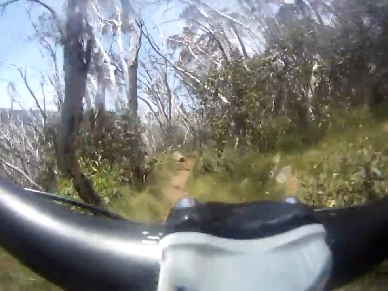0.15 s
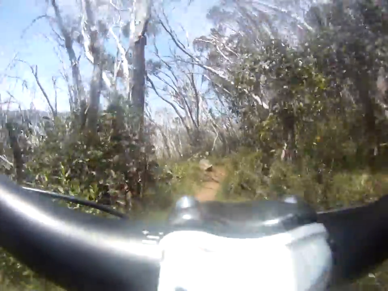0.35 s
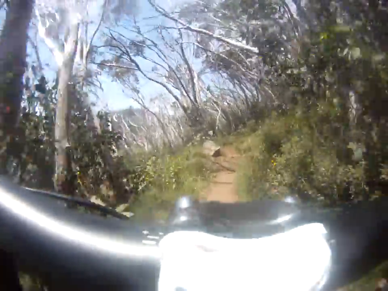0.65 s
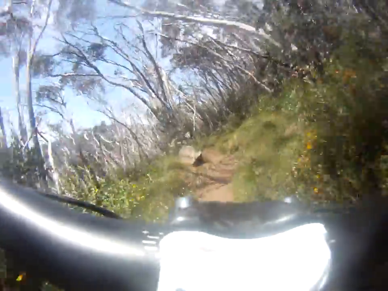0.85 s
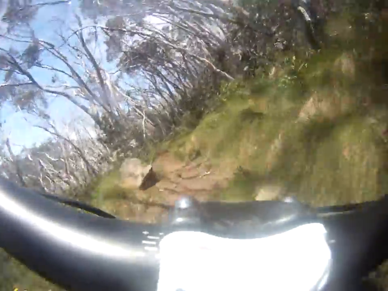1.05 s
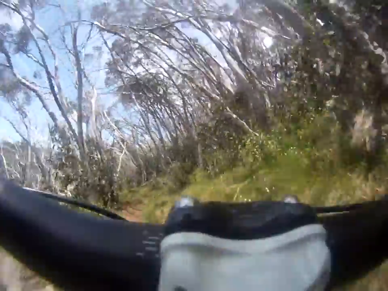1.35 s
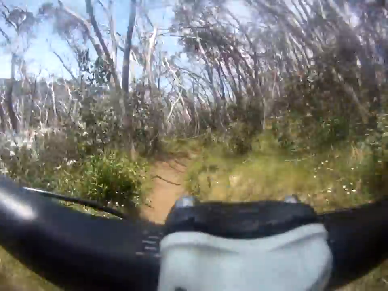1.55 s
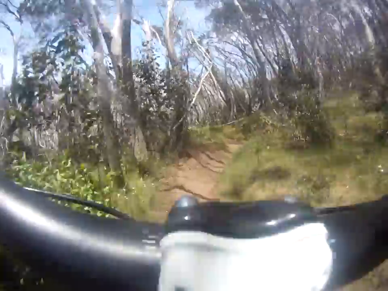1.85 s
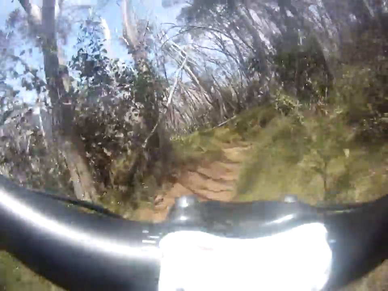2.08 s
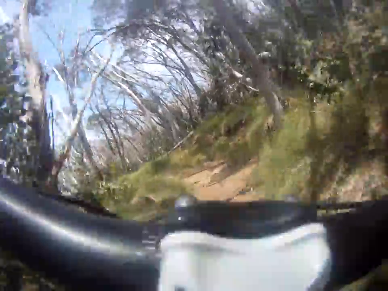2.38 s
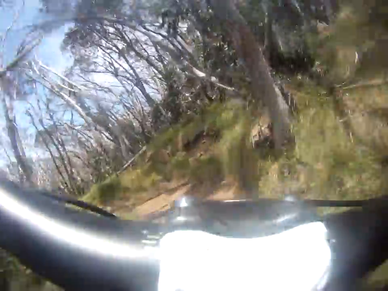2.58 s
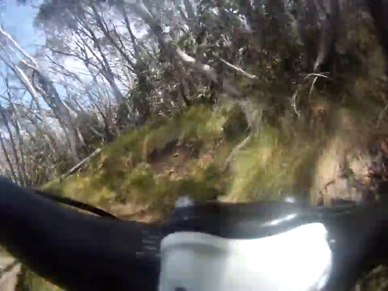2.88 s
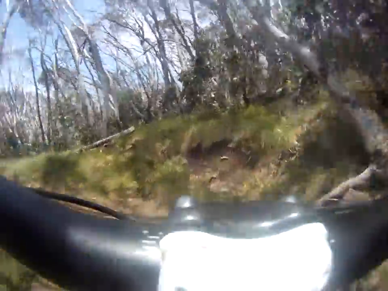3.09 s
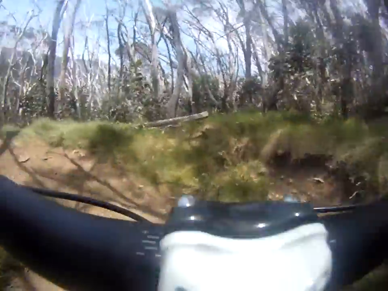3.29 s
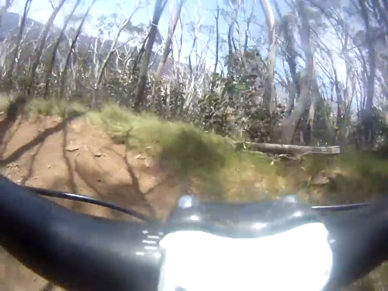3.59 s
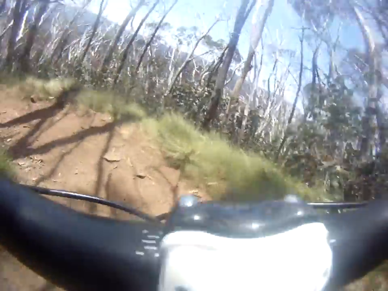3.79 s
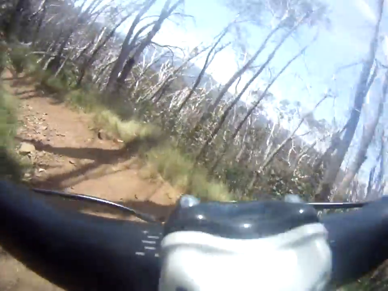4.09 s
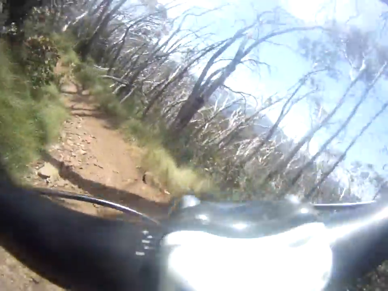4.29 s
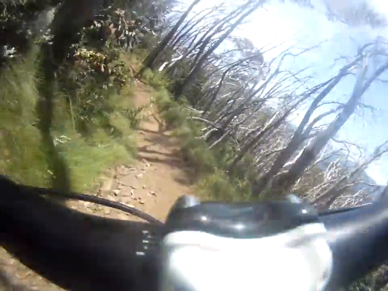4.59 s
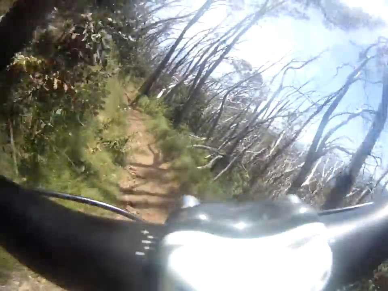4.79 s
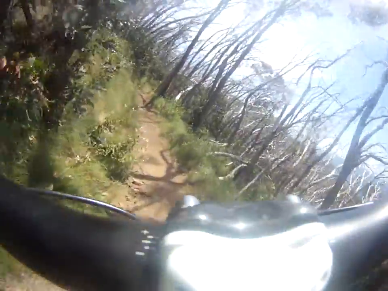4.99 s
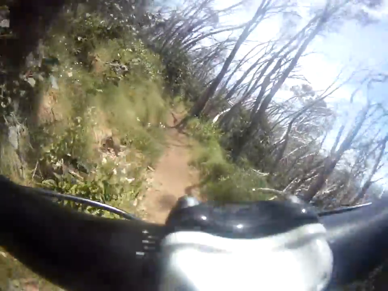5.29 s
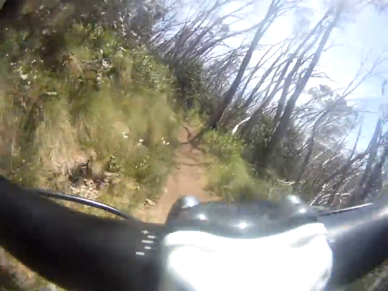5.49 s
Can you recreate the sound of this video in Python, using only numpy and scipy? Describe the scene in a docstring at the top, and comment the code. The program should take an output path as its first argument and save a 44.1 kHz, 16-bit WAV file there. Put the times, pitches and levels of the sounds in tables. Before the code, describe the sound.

A mountain bike descends a dirt track through open woodland, heard from a small camera on the handlebar. Rough tyre drumming and hollow, boxy thuds run throughout, with chain and cable rattle above. Hard hits with metallic pings come early, near the middle and again just after. A corner adds a brief low drone and a soft tread scrub, then the knocks thin out. Low wind buffets the case; the treble is gritty.

```python
"""Hollow thuds and a rough drumming come first: a mountain bike runs down a dirt trail, heard by a handlebar camera.
Grains and short sine swings drum the tyres and bumps through the mount into the camera housing.
Filtered ticks and noise rattle and clack the chain and cables; short frame resonances ping for pebbles.
One corner brings a drone and a scrub of the tread; filtered noise makes the wind that buffets the case.
The camera ducks on hard hits and holds each sample of a slow converter, which adds a gritty treble."""
import sys
import numpy as np
from scipy import signal
from scipy.fft import rfft, irfft
from scipy.io import wavfile
from scipy.ndimage import uniform_filter1d

SR = 44100
rng = np.random.default_rng(int(sys.argv[2]) if len(sys.argv) > 2 else 0)


def dump_mix(stems):
    """Bounce the given channels to the path in sys.argv[1] as a 16-bit WAV at rate SR."""
    frames = np.atleast_2d(stems).T  # one column per channel
    limited = np.clip(frames, -1, 1)  # hard clip at full scale
    pcm = np.round(limited * 32767).astype(np.int16)
    wavfile.write(sys.argv[1], SR, pcm)


N = 249165  # samples in the scene


def undb(db):
    """Decibels to gain."""
    return 10 ** (np.asarray(db) / 20)


def unit(x):
    """Scale to rms 1."""
    return x / np.sqrt(np.mean(x ** 2))


def power(x, span_s):
    """Running mean square."""
    return uniform_filter1d(x ** 2, max(int(span_s * SR), 2)) + 1e-12


def steady(x):
    """Keep the flutter but hold the slow level near rms 1."""
    return x / np.sqrt(power(x, 0.077))


def walk(rate_hz):
    """Random wander of rms 1, in straight lines between new values drawn at rate_hz."""
    knots = rng.standard_normal(4096)
    return unit(np.interp(np.arange(N) / SR * rate_hz, np.arange(len(knots)), knots))


def curves(table):
    """The columns of a timed table, interpolated sample by sample."""
    start_s, *columns = np.transpose(table)
    return [np.interp(np.arange(N) / SR, start_s, column) for column in columns]


def response(colour, size):
    """Causal minimum-phase impulse response of a (pitch_hz, level_db) colour."""
    pitch_hz, level_db = np.transpose(colour)
    f = np.maximum(np.fft.rfftfreq(size, 1 / SR), 1)
    gain = undb(np.interp(np.log(f), np.log(pitch_hz), level_db))
    # folding the cepstrum forward in time makes the response start at once
    cepstrum = irfft(np.log(gain))
    cepstrum[1:size // 2] *= 2
    cepstrum[size // 2 + 1:] = 0
    return irfft(np.exp(rfft(cepstrum)))[:size // 2]


def ring(push, body):
    """Drive a body, given by its impulse response, with a force."""
    return signal.fftconvolve(push, body)[:len(push)]


def grains(per_s, spread_db):
    """Random tiny impacts of uneven size and either sign."""
    strikes = rng.random(N) < per_s / SR
    sign = rng.choice([-1, 1], N)
    return strikes * sign * undb(spread_db * np.minimum(rng.standard_normal(N), 2.5))


def add(out, at_s, sound, peak):
    """Mix in a sound so that its sample number peak falls at at_s."""
    start = int(at_s * SR) - peak
    sound = sound[max(-start, 0):]
    start = max(start, 0)
    out[start:start + len(sound)] += sound


def hump(at_s, length_s):
    """A smooth rise to 1 and back."""
    return np.exp(-np.minimum(((np.arange(N) / SR - at_s) / length_s) ** 2, 20))


# colour of the mount and camera housing, three broad resonances: pitch_hz [Hz], level_db [dB]
HOUSING_COLOUR = [(130, -51), (230, -22.5), (295, -14.5), (327, -2), (370, -17), (430, -14.5), (520, -2),
                  (563, 5), (600, -9), (750, -19), (960, -32.5), (1100, -16), (1250, -17), (1400, -31),
                  (3000, -49)]


def tyres(jolt):
    """Knobs and grit drum on the housing, harder at each jolt, between the thuds of lumpy ground."""
    impacts = grains(per_s=2500, spread_db=6.5) * undb(3.42 * jolt)
    drumming = steady(ring(impacts, response(HOUSING_COLOUR, size=8192)))
    thuds = lumps(pitch_hz=529.4, scatter_octaves=0.26, build_s=0.0045, spread_db=7)
    return undb(-1.2) * drumming + undb(-9.0) * thuds


def lumps(pitch_hz, scatter_octaves, build_s, spread_db, count=150, size=1024):
    """Small clods and ruts give a stream of lesser thuds, each at its own pitch."""
    out = np.zeros(N + 2 * size)
    t = (np.arange(size) - size // 2) / SR
    draws = rng.uniform(-1, 1, size=(count, 5))
    for k, (when, pitch, strength, *phase) in enumerate(draws):
        lump_hz = pitch_hz * 2 ** (scatter_octaves * pitch)
        sound = undb(spread_db * strength) * thud(t, build_s, lump_hz, phase)
        at_s = abs(k + when) / count * N / SR  # an even stream, each thud up to one step early or late
        add(out, at_s, sound, size // 2)
    return unit(out[:N])


# wheels striking roots and stones:
# peak_s [s], level_db [dB], build_s (rise of the swing) [s], pitch_hz (at the peak) [Hz]
WHEEL_KNOCKS = [(.02, -7.5, 0.0018, 514), (.039, -4, 0.0025, 582.6), (.235, -8.5, 0.0053, 548),
                (.524, -7, 0.0072, 554), (.675, 2.5, 0.0006, 730), (.831, -8.5, 0.0062, 539),
                (.86, -9, 0.0062, 584), (.967, -10, 0.0053, 566), (1.04, -10.5, 0.0037, 609),
                (1.057, -8.5, 0.015, 559), (1.218, -6, 0.0023, 582), (1.24, -10, 0.0098, 554),
                (1.42, -12.5, 0.026, 555.5), (1.465, -14.5, 0.017, 553), (1.547, -15, 0.0022, 559),
                (1.627, -24, 0.0061, 568), (1.777, -8, 0.0024, 571), (1.822, -2.5, 0.007, 532.4),
                (2.023, -16, 0.0034, 507), (2.165, -14, 0.0017, 532), (2.416, -10, 0.00093, 602),
                (2.468, -8, 0.0036, 645), (2.53, 1.5, 0.00095, 557), (2.58, -19, 0.0064, 537),
                (2.623, -8.5, 0.0029, 512.6), (2.65, -8, 0.0019, 523.4), (2.696, -7.5, 0.0015, 510.5),
                (2.741, -6, 0.0016, 492), (2.849, -8, 0.003, 535), (3.276, 4, 0.0022, 554),
                (3.341, -15, 0.017, 570), (3.358, -9, 0.0074, 548), (3.776, -9, 0.0027, 584),
                (3.829, -7.5, 0.0041, 552), (3.869, -11.5, 0.0055, 560), (3.957, -10.5, .003, 524),
                (4.049, -13, 0.0037, 579.4), (4.067, -15.5, 0.02, 570), (4.109, -21, 0.0069, 600),
                (4.262, -16, 0.0034, 500), (4.474, -20.5, 0.0063, 571), (4.579, -7.5, 0.0023, 660),
                (4.791, -15.5, 0.0053, 624)]


def knocks(size=4096):
    """One thud for each root or stone that a wheel strikes."""
    out = np.zeros(N + 2 * size)
    t = (np.arange(size) - size // 2) / SR
    phases = rng.random((len(WHEEL_KNOCKS), 2))
    for (peak_s, level_db, build_s, pitch_hz), phase in zip(WHEEL_KNOCKS, phases):
        add(out, peak_s, undb(level_db) * thud(t, build_s, pitch_hz, phase), size // 2)
    return out[:N]


def thud(t, build_s, pitch_hz, phase, fall_s=0.0027, sag_octaves_per_s=25, sag_s=0.0052,
         upper_ratio=2.07, upper_db=-16.5):
    """The camera rocks in its mount: the swing builds, sags in pitch and stops short; the case rings above."""
    swell = np.exp(-(t / np.where(t < 0, build_s, fall_s)) ** 2)
    # the pitch slides down through pitch_hz at the peak, and only close to it
    bend_octaves = -sag_octaves_per_s * t * np.exp(-(t / sag_s) ** 2 / 2)
    turns = pitch_hz * np.cumsum(2 ** bend_octaves) / SR
    rocking = np.sin(2 * np.pi * (turns + phase[0]))
    case = undb(upper_db) * np.sin(2 * np.pi * (upper_ratio * turns + phase[1]))
    return np.sqrt(2) * swell * (rocking + case)


# a bump presses the tyre into the ground, then the rebound unloads it; both grow with the blow
PRESS_DB, PRESS_S = 5.5, 0.031
REBOUND_DB, REBOUND_AFTER_S, REBOUND_S = -1, 0.034, 0.02
FULL_BLOW_DB = -5.5  # a knock of this level or more gives the full press and rebound
# the bike goes light over a crest and tyres and chain fall quieter:
# middle_s [s], length_s [s], depth_db [dB]
LIGHT_CRESTS = [(0.319, 0.013, -7.5), (0.624, 0.023, -3.5), (0.78, 0.0097, -10), (1.729, 0.011, -9),
                (1.885, 0.017, -8.5), (2.677, 0.026, -8), (3.391, 0.036, -7.5), (4.437, .018, -5),
                (4.55, 0.015, -8)]


def load_db():
    """Weight on the tyres: up going into each bump, down on the rebound and over crests."""
    load = np.zeros(N)
    for peak_s, level_db, *_ in WHEEL_KNOCKS:
        press = PRESS_DB * hump(peak_s - PRESS_S / 2, PRESS_S)
        rebound = REBOUND_DB * hump(peak_s + REBOUND_AFTER_S, REBOUND_S)
        load += undb(min(level_db - FULL_BLOW_DB, 0)) * (press + rebound)
    for middle_s, length_s, depth_db in LIGHT_CRESTS:
        load += depth_db * hump(middle_s, length_s)
    return load


# colour of rattling metal as it reaches the microphone: pitch_hz [Hz], level_db [dB]
METAL_COLOUR = [(250, -33.5), (750, -7.5), (1200, 8), (1450, -1.5), (2000, 2.5), (2420, 1.5), (2730, -6.5),
                (2900, 5), (3300, -1.5), (3780, -7), (4040, -8), (4330, -11), (4760, -7), (5600, -20.5)]


def chain(jolt):
    """Links and cables share the jolts, but each part chatters in its own register; grit ticks over them."""
    shake = 0.29 + undb(3.7 * jolt + 2.3 * walk(rate_hz=130))
    edges_hz = [200, 1500, 2100, 2750, 3600, 7000]
    parts = np.zeros(N)
    for register in zip(edges_hz, edges_hz[1:]):
        ticks = grains(per_s=1000, spread_db=2.0) * shake
        parts += signal.sosfilt(signal.butter(2, register, "bandpass", fs=SR, output="sos"), ticks)
    rattle = steady(ring(parts, response(METAL_COLOUR, size=1024)))
    return undb(-0.42) * rattle + undb(-5.5) * grit(loudest_hz=2230, fall_db=15, spread_db=8.0)


def grit(loudest_hz, fall_db, spread_db, count=420, size=512):
    """Coarse grit ticks on the frame at random, each grain with its own size and colour."""
    out = np.zeros(N + 2 * size)
    t = (np.arange(size) - size // 2) / SR
    for when, halves, strength in 2 * rng.random((count, 3)) - 1:
        grain_hz = loudest_hz * 2 ** (halves / 2)  # up to half an octave either way
        tick = undb(spread_db * strength) * ping(t, grain_hz, fall_db)
        add(out, abs(when) * N / SR, tick, size // 2)
    return unit(out[:N])


# chain and cables slapping the frame:
# peak_s [s], level_db [dB], length_s (of the scrape) [s], treble_db (tilt above the knee) [dB per octave]
FRAME_SLAPS = [(.039, -15, .0021, -6), (0.447, -12.5, 0.003, 4), (0.495, -18, 0.0028, 14),
               (0.75, -21, .006, 4), (0.794, -16, .005, 2), (0.86, -14.5, 0.0021, -7),
               (0.876, -13, 0.0032, -1), (.966, -17, 0.0007, 1), (1.033, -13, 0.0031, 5),
               (1.097, -18, 0.0051, 0.5), (1.234, -17, 0.0029, 2), (1.816, -17, .0038, 4),
               (1.976, -14, 0.0019, 11), (2.065, -15.5, 0.0032, 4), (2.529, -6.5, 0.0047, 4),
               (2.813, -18.5, 0.0024, -16), (2.93, -10.5, 0.0059, -4.5), (2.998, -14, 0.0044, -3),
               (4.472, -13.5, 0.0022, -7), (4.576, -17, 0.0043, -13)]


def clacks(tail_db, tail_s, lead_s, knee_hz, size=4096):
    """Each slap is a quick scrape of noise amid loose chatter, with its own treble tilt on the metal."""
    out = np.zeros(N + 2 * size)
    t = (np.arange(size) - size // 4) / SR
    chatter = np.exp(-np.abs(t) / np.where(t < 0, lead_s, tail_s))
    for peak_s, level_db, length_s, treble_db in FRAME_SLAPS:
        tilted = [(f, db + treble_db * max(np.log2(f / knee_hz), 0)) for f, db in METAL_COLOUR]
        contact = np.exp(-(t / length_s) ** 2) + undb(tail_db) * chatter
        hit = unit(ring(rng.standard_normal(size) * contact, response(tilted, size=1024)))
        loudness = power(hit, span_s=.003)
        centre = int(np.average(np.arange(size), weights=loudness ** 2))
        # the loudest moment sets the level
        add(out, peak_s, undb(level_db) * hit / np.sqrt(loudness.max()), centre)
    return out[:N]


# pebbles pinging off rim and frame:
# peak_s [s], level_db [dB], loudest_hz [Hz], fall_db (fall-off to either side) [dB per octave]
PEBBLES = [(0.672, -4.5, 3080, 9), (.676, 3.5, 2400, 11), (1.216, -12, 1900, 17), (1.545, -17, 2200, -1),
           (1.559, -16, 3300, 0), (1.692, -19.5, 2900, 2), (1.933, -10.5, 4740, 4.5), (2.157, -12, 4100, 7),
           (2.215, -3, 2650, 5.5), (2.914, -8, 1590, 20), (3.032, -1.5, 2500, 9), (3.137, -5.5, 1950, 12.5),
           (3.533, -10.5, 2200, 16), (3.633, -13.5, 2560, 30), (3.737, -9.5, 2880, 30),
           (4.295, -11, 2780, 28), (4.39, -10.5, 2756, 27), (5.312, -10, 1985, 12.5),
           (5.349, -13.5, 2325, 10)]


def pings(chatter_db, chatter_s, size=2048):
    """Each pebble pings and shakes loose parts around it."""
    out = np.zeros(N + 2 * size)
    t = (np.arange(size) - size // 2) / SR
    metal = response(METAL_COLOUR, size=1024)
    for peak_s, level_db, loudest_hz, fall_db in PEBBLES:
        chatter = unit(ring(rng.standard_normal(size), metal)) * np.exp(-np.abs(t) / chatter_s)
        sound = ping(t, loudest_hz, fall_db) + undb(chatter_db) * chatter
        add(out, peak_s, undb(level_db) * sound, size // 2)
    return out[:N]


# what rim and frame ring with, before each ping detunes it: pitch_hz [Hz], level_db [dB]
FRAME_MODES = [(1200, 1.5), (2130, 0), (2400, -1.5), (2900, 1), (3220, -3), (4080, -3.5), (4800, -3)]


def ping(t, loudest_hz, fall_db, length_s=0.0017, scatter=0.036):
    """A stone rings the frame for a moment, most near one pitch."""
    mode_hz, mode_db = np.transpose(FRAME_MODES)
    gain = undb(mode_db - fall_db * np.abs(np.log2(mode_hz / loudest_hz)))
    detune, phase = 2 * rng.random((2, len(FRAME_MODES))) - 1
    turns = np.outer(t, mode_hz * (1 + scatter * detune)) + phase
    modes = np.sin(2 * np.pi * turns) @ gain
    return unit(modes) * np.exp(-(t / length_s) ** 2)


# the tyre biting in the corner: start_s [s], hum_hz (middle of its wobble) [Hz], hum_db [dB], scrub_db [dB]
CORNERING = [(3.7, 76.7, -57, -29), (3.85, 75.6, -41, -18), (4.03, 78.8, -18, -23), (4.17, 82, -35, -20),
             (4.3, 83.9, -21, -60), (4.55, 80.7, -41, -59)]
# colour of the tread scrubbing sideways: pitch_hz [Hz], level_db [dB]
SCRUB_COLOUR = [(250, -37), (370, -6.5), (440, -5.5), (620, -3), (800, -14.5), (1000, -24), (3000, -49)]


def corner(jolt):
    """Leaning on the side knobs makes the tyre drone and scrub across the dirt."""
    hum_hz, hum_db, scrub_db = curves(CORNERING)
    wobbling_hz = hum_hz * (1 + 0.025 * walk(rate_hz=25))
    hum = np.sqrt(2) * np.sin(2 * np.pi * np.cumsum(wobbling_hz) / SR)
    impacts = grains(per_s=1700, spread_db=3) * undb(2.6 * jolt)
    scrub = steady(ring(impacts, response(SCRUB_COLOUR, size=2048)))
    return undb(hum_db) * hum + undb(scrub_db) * scrub


# the air, before the trims in wind(): start_s [s], buffet_db [dB], rush_db (smaller eddies) [dB]
AIRFLOW = [(0, -20.5, -32), (.36, -23, -33.5), (.49, -16.5, -25.5), (.72, -32, -43), (.82, -31, -32),
           (1.04, -20, -32), (1.34, -28, -31.5), (1.54, -14, -29.5), (1.9, -29.5, -35), (2.02, -19, -29),
           (2.42, -21, -32), (2.75, -27, -42), (3.0, -23.5, -39), (3.45, -28.5, -54), (3.87, -26, -39.5),
           (5.3, -24, -41), (5.65, -24, -50)]
# colour of the wind on the case: pitch_hz [Hz], level_db [dB]
BUFFET_COLOUR = [(10, -39), (22, -1.5), (48, -3), (63, 9.5), (72, -0.5), (82, 4), (95, -9.5), (130, -21),
                 (400, -55.5)]
# colour of the smaller eddies: pitch_hz [Hz], level_db [dB]
RUSH_COLOUR = [(60, 10.5), (110, 0.5), (160, 1), (220, -5), (500, 1), (4000, -81)]


def wind():
    """Large eddies buffet the case and small ones rush past it, both as filtered noise."""
    buffet_db, rush_db = curves(AIRFLOW)
    buffet = steady(ring(rng.standard_normal(N), response(BUFFET_COLOUR, size=16384)))
    rush = steady(ring(rng.standard_normal(N), response(RUSH_COLOUR, size=16384)))
    gusts = undb(1.0 * walk(rate_hz=9.8))
    return undb(buffet_db - 1.3) * buffet * gusts + undb(rush_db + 6.0) * rush


# the ride, set by speed and roughness of the ground, before load and trims:
# start_s [s], tyre_db (drumming) [dB], chain_db (rattle) [dB]
TRAIL_RIDE = [(0, -21, -31), (.45, -17.5, -25), (.75, -24.5, -33.5), (1.0, -20.5, -27), (1.35, -21.5, -31),
              (1.6, -17.5, -26), (1.8, -22.5, -34.5), (2.1, -16.5, -24.5), (2.47, -17.5, -26),
              (2.75, -26.5, -34), (3.03, -18, -25.5), (3.45, -23, -28.5), (3.86, -22, -28),
              (4.3, -17.5, -26), (4.6, -24, -30.5), (5.2, -24, -31.5), (5.37, -17.5, -29.5),
              (5.65, -26.5, -35)]


def scene():
    """The same load and jolts shake housing and chain; the big hits stand out of them."""
    tyre_db, chain_db = curves(TRAIL_RIDE)
    jolt, load = walk(rate_hz=55), load_db()
    drumming = undb(tyre_db + load) * tyres(jolt)
    rattle = undb(chain_db + 0.94 * load - 1.85) * chain(jolt)
    slaps = clacks(tail_db=-13, tail_s=.005, lead_s=.0018, knee_hz=2600)
    pebbles = pings(chatter_db=-16, chatter_s=.0032)
    return (drumming + knocks() + rattle + slaps + pebbles + corner(jolt) + wind())[None]


def limiter(x, release_s):
    """The gain drops at once on a loud hit and creeps back, by a factor e every release_s."""
    level = np.log(power(x, span_s=.0015)) / 2  # natural log of the rms
    over = np.maximum(level - np.log(undb(-2.5)), 0)
    recovery = np.arange(N) / SR / release_s
    return x * np.exp(recovery - np.maximum.accumulate(over + recovery))


def record(dry):
    """Limiter, overload, then a slow converter whose held samples mirror the sound around its rate."""
    converter_hz, input_top_hz, output_top_hz = 12000, 5750, 15300
    x = np.clip(limiter(dry[0], release_s=0.089), -1, 1)
    x = signal.sosfilt(signal.butter(12, input_top_hz, fs=SR, output="sos"), x)
    mirrored = x * (1 + 2 * np.cos(2 * np.pi * converter_hz * np.arange(N) / SR))
    # holding each sample for one converter step shades the treble by a sinc
    hold = np.sinc(np.fft.rfftfreq(N, 1 / SR) / converter_hz)
    held = np.clip(irfft(rfft(mirrored) * hold, N), -1, 1)
    return signal.sosfilt(signal.ellip(10, .2, 70, output_top_hz, fs=SR, output="sos"), held)[None]


dry = scene()
out = record(dry)
dump_mix(out)
```